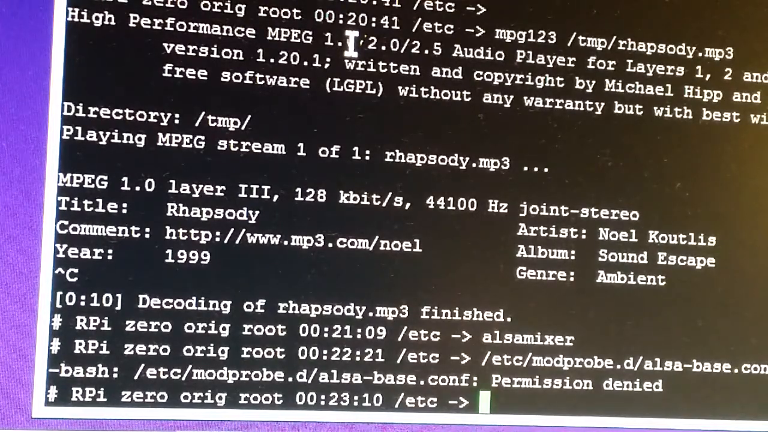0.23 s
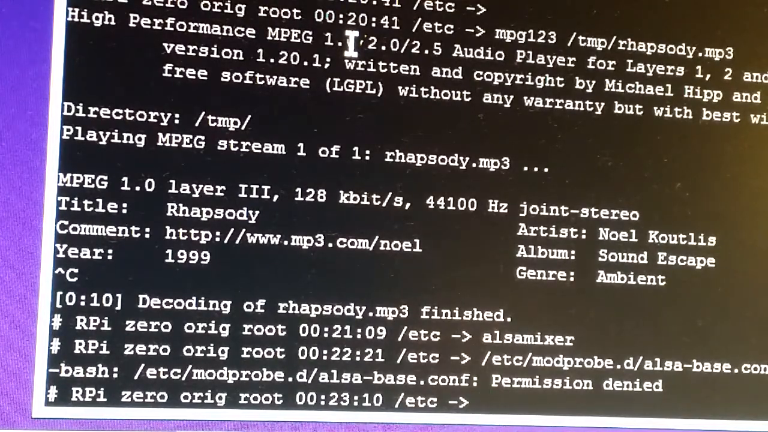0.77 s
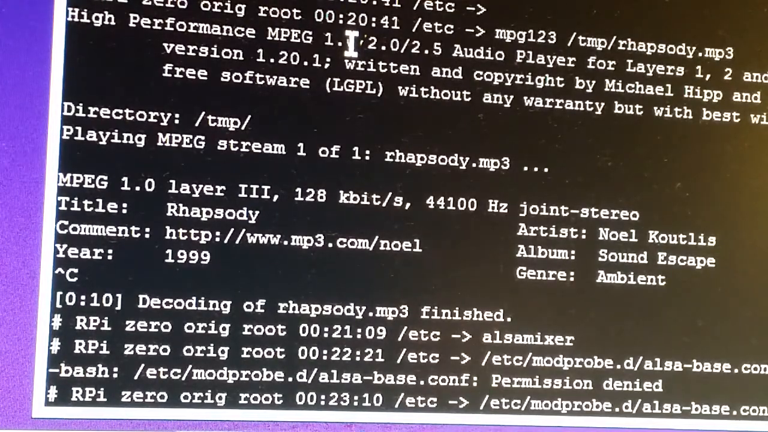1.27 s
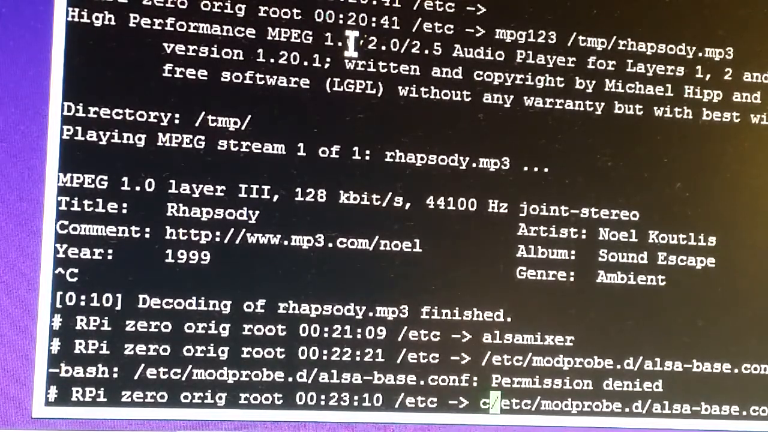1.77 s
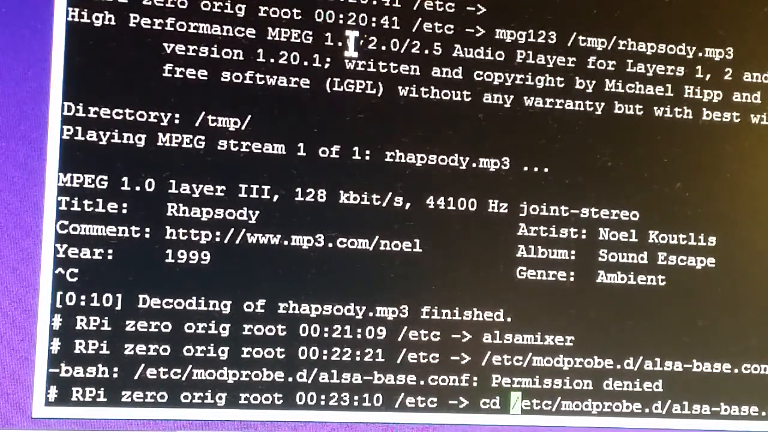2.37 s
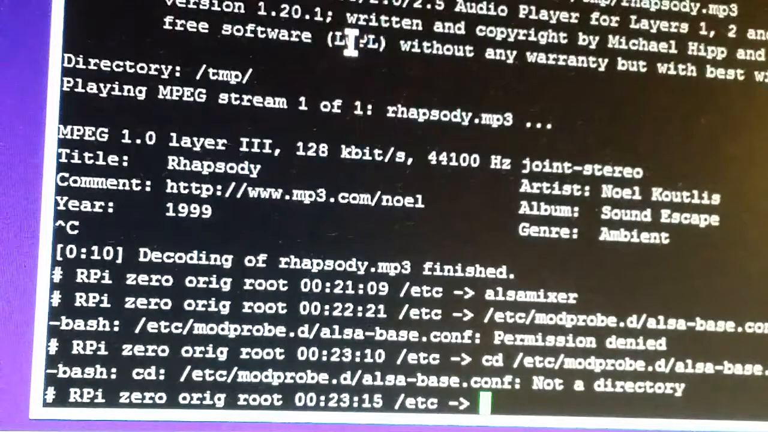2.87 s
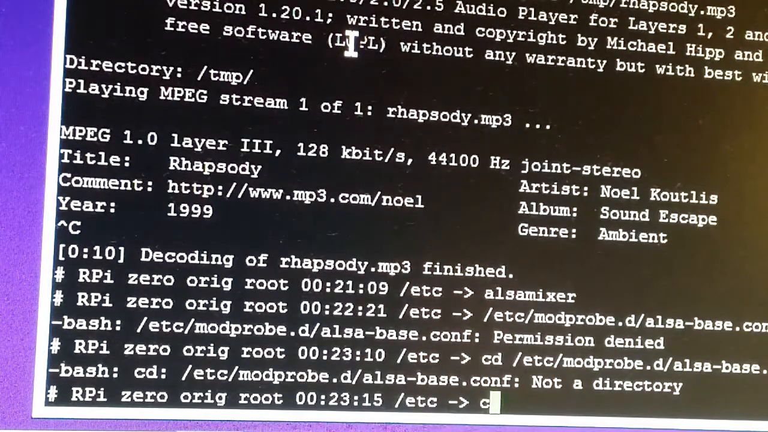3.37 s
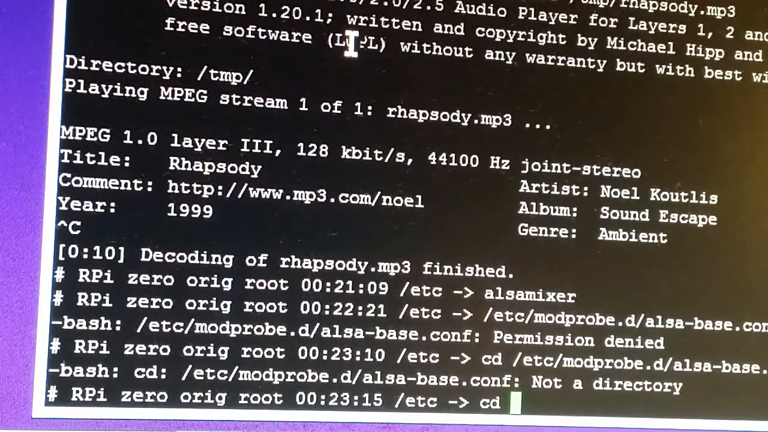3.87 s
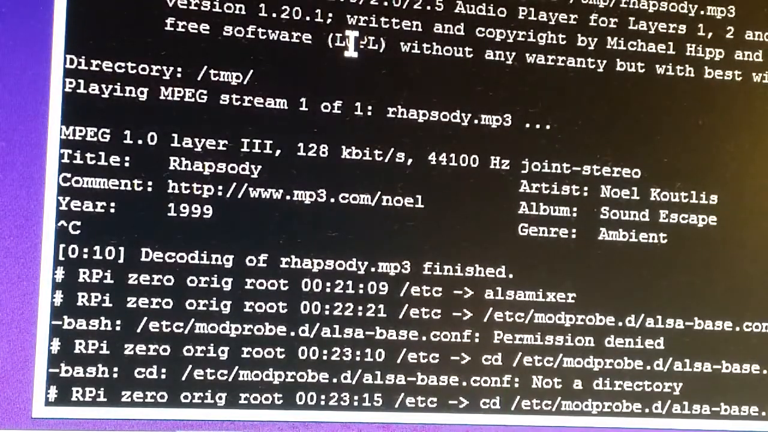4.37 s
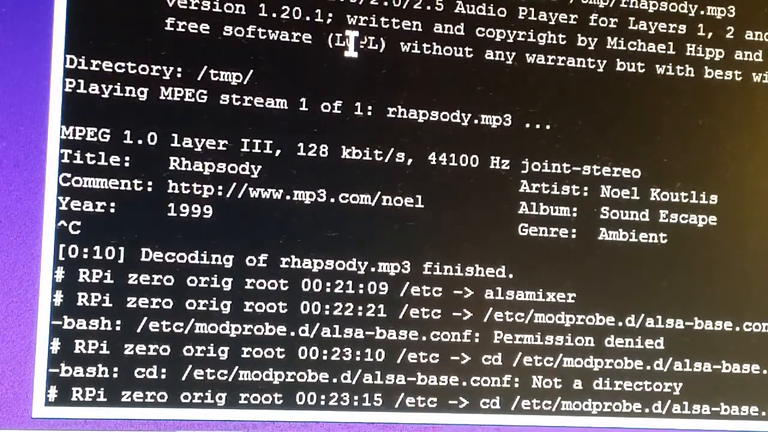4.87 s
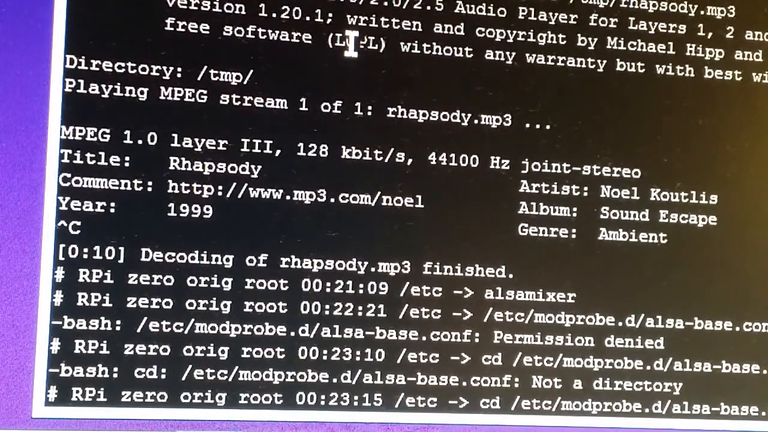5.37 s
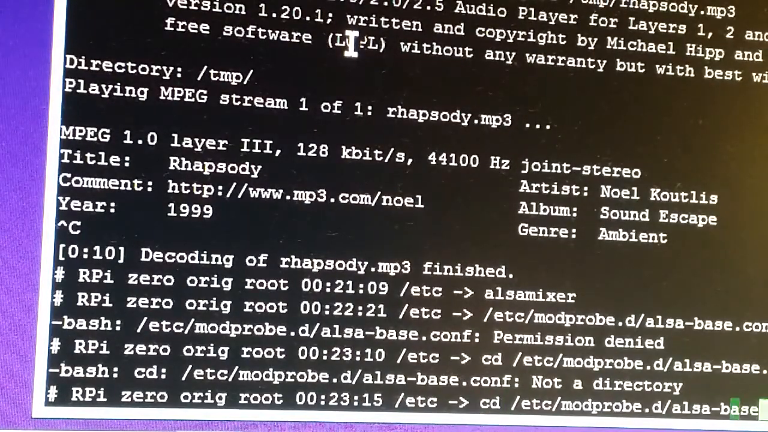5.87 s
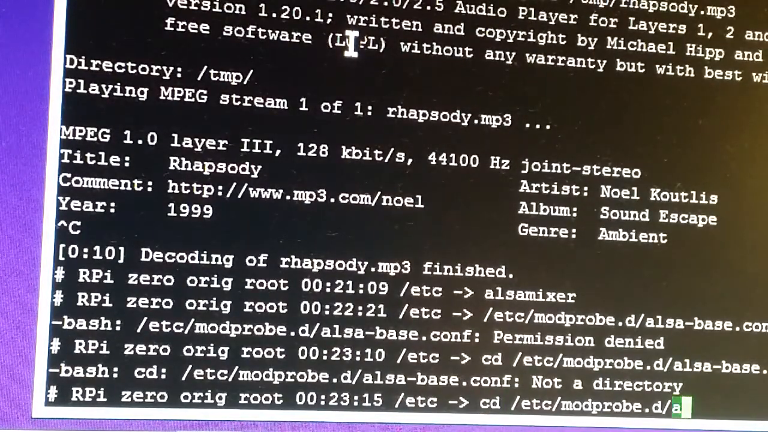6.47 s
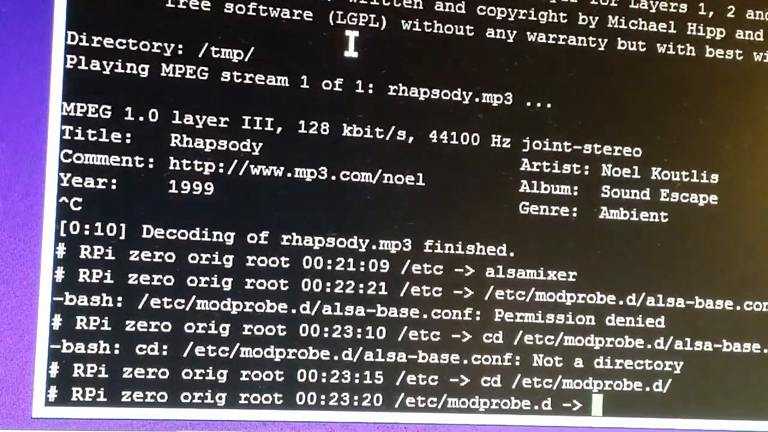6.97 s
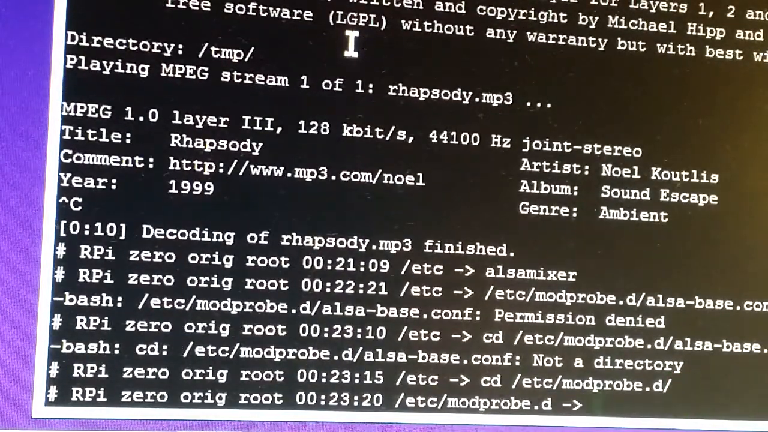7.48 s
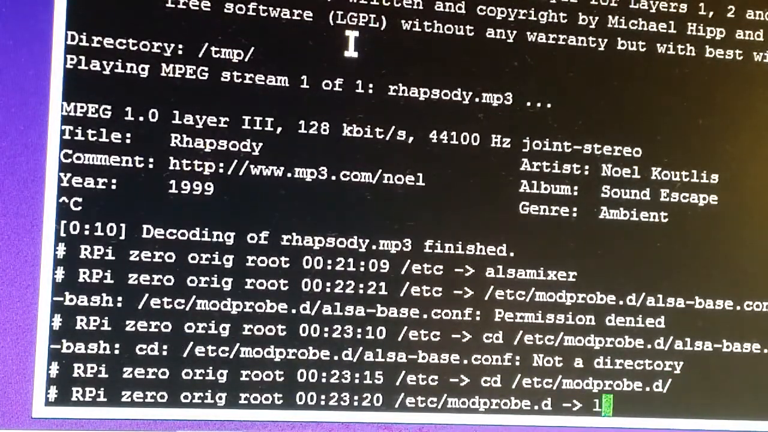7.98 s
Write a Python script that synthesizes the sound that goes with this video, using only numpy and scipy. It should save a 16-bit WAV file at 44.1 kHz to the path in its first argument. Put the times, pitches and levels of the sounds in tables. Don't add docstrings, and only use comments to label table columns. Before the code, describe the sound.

Close stereo pickup of typing on a plastic computer keyboard in a small quiet room. A faint touch opens, then mostly light brushing until bright clicks gather from about 1.6 to 4.3 seconds. A sharp group strikes near 5, more strokes come between 6 and 7.4, then faint rustles. A fan hums steadily underneath, with distant traffic and one far engine passing early on.

```python
import sys
import numpy as np
from scipy import signal
from scipy.fft import rfft, irfft, next_fast_len
from scipy.io import wavfile
from scipy.ndimage import uniform_filter1d, map_coordinates

SR = 44100
rng = np.random.default_rng(int(sys.argv[2]) if len(sys.argv) > 2 else 0)


def transcribe(signal):
    frames = np.atleast_2d(signal).T
    limited = np.clip(frames, -1, 1)
    pcm = np.round(limited * 32767).astype(np.int16)
    wavfile.write(sys.argv[1], SR, pcm)


def boost(x):
    u = np.asarray(x, float) / 20
    return 10 ** u


N = 363031

FAINT_LEFT_DB = -2.5
LEFT_LAG = 11


def unit(x):
    return x / np.sqrt(np.mean(x ** 2) + 1e-20)


def along(points, hz):
    f, v = np.transpose(points)
    return np.interp(np.log(hz + 1), np.log(f + 1), v)


def wobble(rate):
    knots = rng.standard_normal(int(N * rate / SR) + 4)
    coarse = map_coordinates(knots, [np.arange(0, N + 64, 64) * rate / SR])
    return np.interp(np.arange(N) / 64, np.arange(len(coarse)), coarse)


def filtered(x, response):
    m = next_fast_len(N + SR // 2)
    return irfft(rfft(x, m) * response(np.fft.rfftfreq(m, 1 / SR)), m)[..., :N]


def resonance(f, centre, width):
    return 1j * f * width / (centre * centre - f * f + 1j * f * width)


def body(modes, f):
    total = 0
    for k, (centre, width, db) in enumerate(modes):
        total = total + (-1) ** k * boost(db) * resonance(f, centre, width)
    return total


def rush(spectrum, patchy_db):
    # (frequency [Hz], correlation [-1..1])
    likeness = [(60, 0.9), (130, 0.98), (290, 0.89), (640, 0.36), (1410, -0.22), (3100, -0.094),
                (6820, -0.065), (15000, -0.13)]
    z = signal.stft(rng.standard_normal((2, N)), nperseg=512)[2]
    field = uniform_filter1d(rng.standard_normal(z.shape[1:]), size=6, axis=0)
    field = uniform_filter1d(field, size=14, axis=1)
    pair = signal.istft(z * boost(patchy_db * unit(field)), nperseg=512)[1][:, :N]

    def mid_side_gain(hz):
        turn = np.arccos(np.clip(along(likeness, hz), -1, 1)) / 2
        return boost(along(spectrum, hz)) * [np.cos(turn), np.sin(turn)]

    mid, side = filtered(pair, mid_side_gain)
    return unit(np.array([mid + side, mid - side]))


def background():
    # (time [s], level [dB])
    traffic = [(0.0, -56), (0.78, -59.5), (1.37, -57), (2.1, -57), (3.03, -62), (3.8, -58), (4.4, -59.5),
               (6.1, -61), (6.69, -56), (7.31, -60), (8.23, -59)]
    # (frequency [Hz], density [dB per Hz])
    rumble_colour = [(20, -57), (40, -20), (55, -1.5), (85, 4), (120, 4), (150, -8), (250, -6.5),
                     (400, -31)]
    # (frequency [Hz], density [dB per Hz])
    drone_colour = [(110, -37), (135, -4), (158, 1.5), (178, -5), (195, -4), (215, -14.5), (300, -41.5)]
    # (frequency [Hz], density [dB per Hz])
    fan_colour = [(60, -82), (200, -2.5), (320, -1), (450, -7), (800, -8.5), (1150, -12), (1700, -19.5),
                  (3500, -24.5), (4600, -29.5), (6000, -22.5), (10000, -20), (16000, -29.5)]
    # (frequency [Hz], level [dB])
    hum = [(240, -72), (312, -66), (322, -73), (769.8, -74.5), (959, -81), (1059, -79), (1238, -81)]
    engine_db, engine_far_db = -52.5, -59.5
    nearest_s, pass_s = 1.89, 0.54
    fan_level_db, fan_lift = -58, 0.24

    t = np.arange(N) / SR
    rumble_db = np.interp(t, *np.transpose(traffic))
    nearness = 1 / (1 + ((t - nearest_s) / pass_s) ** 2)
    swell_db = 10 * np.log10(1 + boost(engine_db - engine_far_db) ** 2 * nearness)
    drone_db = engine_far_db + swell_db
    outdoor_swell_db = swell_db - swell_db.mean() + rumble_db - rumble_db.mean()
    fan_db = fan_level_db + fan_lift * outdoor_swell_db
    rumble = boost(rumble_db + 0.33 * wobble(2.7)) * rush(rumble_colour, patchy_db=0.0)
    drone = boost(drone_db + 0.7 * wobble(3)) * rush(drone_colour, patchy_db=0.56)
    fan = boost(fan_db + 0.12 * wobble(7.2)) * rush(fan_colour, patchy_db=0.7)
    tones = 0
    for hz, db in hum:
        phase = 2 * np.pi * hz * t + 1.2 * wobble(9)
        spread = hz / 1800 * np.array([[1], [-1]])
        tones = tones + boost(db + 3 + 1.5 * wobble(7)) * np.sin(phase + spread)
    return rumble + drone + fan + tones


def kind(rows, knock_db):
    softness_gain = 0.21
    return [(s, db, knock_db - softness_gain * hard_db, hard_db, left_db, ms)
            for s, db, hard_db, left_db, ms in rows]


def contacts():
    # (time [s], blow [dB], hardness [dB], left over right [dB], contact [ms])
    clicks = [(1.5878, -25.5, -3.5, -0.5, 1.3), (2.1317, -29.5, -3.5, 0.5, 4), (2.3115, -33, 1, 2, 4),
              (2.3147, -20, -10, -12, 1.7), (2.3184, -31, 2, -4, 1.3), (2.3264, -29, -1.5, -3, 1.9),
              (2.3337, -36, -14, 10, 1.4), (2.4655, -28.5, -5.5, -18, 3), (3.0159, -42.5, 7, -12, 2.4),
              (3.0283, -45.5, 4, 0, 2), (3.0482, -40, 0, -1, 2.6), (3.3501, -32.5, -4.5, -7, 3.8),
              (3.6896, -35, -13, 1, 1.2), (3.6926, -27.5, -1.5, -7, 2), (3.6964, -34, -2, 4, 1.2),
              (3.7, -36, 0, -6, 1.3), (3.7044, -32, -2, 1.5, 3.4), (3.7123, -32, -9, -16, 2.5),
              (3.7226, -29, -2, -4.5, 7.7), (3.7431, -45, -3, 0, 2), (3.8081, -43.5, 3, 5, 3.7),
              (4.3231, -27, -6, -7, 4), (4.4912, -38.5, -1, -15, 1.7), (7.9268, -43.5, 7, -9, 2.1)]
    landings = [(0.1499, -36.5, -6, -5, 1.8), (1.6677, -34.5, -4, -1, 5), (1.7041, -37, -7, 1, 3.7),
                (1.7182, -33, -8, -4, 1.8), (1.9287, -38, -6, -5, 3.0), (2.3451, -31, -8, -10, 3),
                (2.4537, -28, -1, -2, 6), (3.3084, -31, 2, 4, 4.1), (3.4254, -34, -10, -1, 1.6),
                (3.5253, -34, 3.5, 0.5, 2.8), (3.6375, -35, -4, 2.5, 8.4), (4.9617, -33.5, 1, 0, 0.68),
                (5.1069, -23.5, -5.5, -4.5, 2.4), (5.2135, -34, -6, -3, 2.8),
                (6.0678, -33.5, -2.5, -9, 3.9), (6.2937, -37, -0.5, -4, 1.7), (6.3035, -39.5, -0.5, 1, 1.3),
                (6.4071, -25.5, 0, -5, 2.5), (6.8993, -21, -12, -5, 2.8), (7.0062, -39, 0, 2, 6.8),
                (7.01, -37.5, 4, -8, 5.1), (7.2475, -46, 8.5, -16, 1.5), (7.3004, -38.5, -10.5, -4, 3.8),
                (7.393, -37.5, -7, -4, 5.2)]
    bottoms = [(0.1896, -41.5, 4.5, -4, 1.9), (1.8088, -38, 3.5, 1, 5.3), (1.8284, -37, 2.5, -4, 2.8),
               (2.0282, -37.5, 1.5, 2, 3.5), (2.0334, -40, -4, -13, 2.1), (2.1762, -31.5, -10, -2.5, 2.9),
               (2.5777, -42, 4.5, -2, 1.8), (3.3172, -32.5, -10, -8, 4.5), (3.5584, -34, -19, -1, 2.7),
               (3.9799, -40, 3.5, -2.5, 7), (4.9546, -33.5, 6.5, 0, 1.1), (5.037, -34, -9, -10, 3),
               (5.0426, -34.5, 3, -4, 5.4), (5.1142, -36.5, 2, -3, 1.7), (5.119, -44, -7, -21, 1.4),
               (5.2458, -31.5, 1.5, -1, 1.8), (5.2651, -35, 3, 1.5, 3.2), (6.1906, -41.5, 4.5, -4, 1),
               (6.4205, -37, -7, -10, 2.7), (6.5005, -38, 0, -5, 8.9), (6.5064, -38, -4, -1, 3.3),
               (6.5137, -40.5, 2, -6, 1.7), (6.8917, -32.5, 9, 0, 0.87), (7.2428, -38, 0, -3, 2.6)]
    # (time [s], blow [dB], hardness [dB], contact [ms])
    rattles = [(0.205, -43, -5, 2.8), (0.465, -42.5, -5, 1.7), (1.152, -39.5, -5, 1.9),
               (1.1952, -40, -4, 1.4), (1.287, -39, 0.5, 2), (1.464, -44, -2, 6.5), (1.509, -40, 0, 2.9),
               (1.7114, -41, -8, 1.1), (1.7272, -49, -2, 1.8), (2.4854, -39, -5, 1.5),
               (2.5902, -37.5, -15, 1.6), (3.006, -40, -2, 2.4), (3.3654, -42, -8, 1.9),
               (3.37, -42, -12, 1.8), (3.4352, -45, -1, 1.6), (3.6875, -35, -4, 4),
               (3.8233, -46.5, 8.5, 1.6), (5.199, -42, -3, 1.7), (6.056, -39, -5, 3),
               (6.289, -40.5, -5, 1.4), (6.484, -42, -7, 1.2), (7.003, -36, -3, 1.7), (7.279, -43, -4, 2.1),
               (7.339, -46, -8, 6.5), (7.42, -47, -6, 7.1), (7.908, -45, -9, 2.7), (8.09, -43, -11, 5),
               (8.1848, -40.5, 2.5, 1.9)]
    # (time [s], blow [dB], hardness [dB])
    brushes = [(0.161, -50, 7.5), (0.2, -42, -5), (0.5119, -48, -1), (0.838, -50, -5), (1.2034, -45, 3.5),
               (1.293, -43, -1), (1.4368, -42, -18), (1.442, -54, 5), (1.4562, -42, -10), (1.4935, -48, 0),
               (2.268, -48, -5), (2.271, -49, 5.5), (2.5173, -47, -2), (3.0669, -48, -2),
               (3.4862, -48, 3.5), (3.627, -43, -6), (4.0059, -48, -9), (6.038, -45, -6), (6.223, -44, -9),
               (6.2383, -46, -5), (6.4977, -50, -9), (7.1313, -46, -5.5), (7.26, -45, -8),
               (7.287, -51, -11), (7.3148, -46, -1), (7.332, -49, -2), (7.9612, -51, 5), (8.105, -42, -6),
               (8.1235, -50.5, 9.5), (8.177, -41, -7)]
    brush_ms = 1.5
    sided_rattles = [(s, db, hard_db, FAINT_LEFT_DB, ms) for s, db, hard_db, ms in rattles]
    sided_brushes = [(*row, FAINT_LEFT_DB, brush_ms) for row in brushes]
    return (kind(clicks, knock_db=-38.5) + kind(landings, knock_db=-10) + kind(bottoms, knock_db=-3)
            + kind(sided_rattles, knock_db=-10.5) + kind(sided_brushes, knock_db=-6.5))


CONTACTS = contacts()


def own_modes(width_hz, share, count):
    f = np.fft.rfftfreq(2048, 1 / SR)
    centre = 700 * 22 ** rng.random((len(CONTACTS), count, 1))
    width = width_hz * np.sqrt(centre / 4000)
    gain = share + resonance(f, centre, width).sum(axis=1)
    return gain / np.sqrt(np.mean(np.abs(gain[:, 30:700]) ** 2, axis=1, keepdims=True))


def bursts(db, stretch, shared, slide_db, solid, plain):
    s, *_, left_db, ms = np.transpose(CONTACTS)
    span = np.arange(-400, 1648)
    t = span * 1000 / SR - .7
    u = t / (stretch * np.clip(ms, .4, 8)[:, None])
    blow = np.exp(-np.where(u < 0, 14 * u ** 2, 3.5 * np.abs(u) ** 1.6))
    slide = boost(slide_db) * np.exp(-np.abs(t) / np.where(t < 0, 1.1, 4))
    shape = (blow + slide) / np.linalg.norm(blow + slide, axis=1, keepdims=True)
    near, other = rng.standard_normal((len(s), 2, 2048)).transpose(1, 0, 2)
    near[:, 431] = solid * 1.82 / np.sqrt(ms)
    other[:, 436] = near[:, 431]
    shared = np.clip(shared, 0, 1)
    far = boost(left_db)[:, None] * (shared * near + np.sqrt(1 - shared ** 2) * other)
    pair = boost(db)[:, None] * shape * [far, near]
    pair = irfft(rfft(pair) * own_modes(550, share=plain, count=12))
    at = (np.round(s * SR).astype(int)[:, None] + span).ravel()
    return np.array([np.bincount(at + lag, v.ravel(), N + 2100)[:N] for v, lag in zip(pair, (LEFT_LAG, 0))])


def keyboard():
    # (frequency [Hz], level [dB])
    cap_colour = [(1500, -69), (2600, -9), (4000, -5.5), (5500, 1), (7000, -0.5), (9000, -75)]
    # (frequency [Hz], level [dB])
    stem_colour = [(5500, -14.5), (7300, 0.5), (10000, -7), (12500, 0), (15000, -5.5), (18000, -15)]
    # (centre [Hz], width [Hz], level [dB])
    case_modes = [(466, 320, -37), (855, 740, -11), (1220, 600, -14.5), (1580, 190, -5), (2270, 350, -7.5),
                  (3220, 370, -6), (4100, 600, -12)]
    _, blow_db, knock_db, hard_db, *_ = np.transpose(CONTACTS)
    cap = bursts(blow_db + 16.5, stretch=1.0, shared=0.066, slide_db=-14, solid=1.4, plain=7.8)
    cap = filtered(cap, lambda hz: boost(along(cap_colour, hz)))
    stem = bursts(blow_db + hard_db + 19, stretch=1.0, shared=0.11, slide_db=-13, solid=1.8, plain=1.8)
    stem = filtered(stem, lambda hz: boost(along(stem_colour, hz)))
    case = bursts(blow_db + knock_db + 26, stretch=0.93, shared=0.55, slide_db=-11, solid=4.6, plain=2.6)
    case = filtered(case, lambda hz: body(case_modes, hz))
    return cap + stem + case


def tail(t60, size):
    hz, t, z = signal.stft(rng.standard_normal((2, size)), SR, nperseg=128)
    x = signal.istft(z * boost(-60 * t / t60(hz)[:, None]), SR, nperseg=128)[1]
    return x / np.linalg.norm(x, axis=1, keepdims=True)


def space(x):
    # (frequency [Hz], t60 [s])
    room_decay = [(500, 0.067), (3000, 0.42), (8000, 0.27), (15000, 0.12)]
    # (frequency [Hz], t60 [s])
    desk_decay = [(1000, 0.054), (5000, 0.046), (9000, 0.038), (15000, 0.012)]
    out = np.zeros((2, N + SR))
    for at in range(0, N, 7000):
        walls = boost(-16.5) * tail(lambda hz: along(room_decay, hz), size=9000)
        answer = np.pad(walls, ((0, 0), (250, 0)))
        desk = boost(-8.0) * tail(lambda hz: along(desk_decay, hz), size=3000)
        size = desk.shape[1]
        ticks = np.repeat(boost(7 * rng.standard_normal(size // 40 + 1)), 40)[:size]
        answer[:, :size] += desk * unit(ticks)
        echo = signal.fftconvolve(x[:, at:at + 7000], answer, axes=1)
        out[:, at + 40:at + 40 + echo.shape[1]] += echo
    return out[:, :N]


def rings(rows, lift_db, held_s):
    ring_lag_s = .0004
    x, t = np.zeros((2, N + 1000)), np.arange(400) / SR
    swell = t / held_s * np.exp(-(t / held_s) ** 2 / 2)
    for s, db, hz, left_db in rows:
        tone = boost(db + lift_db) * swell * np.sin(2 * np.pi * hz * t)
        at = round((s + ring_lag_s) * SR)
        x[0, at + LEFT_LAG:at + LEFT_LAG + 400] += boost(left_db) * tone
        x[1, at:at + 400] += tone
    return x[:, :N]


def ringing():
    # (time [s], peak [dB], pitch [Hz], left over right [dB])
    cap_rings = [(0.189, -49, 6430, -2), (1.2865, -44, 6640, -2), (1.5873, -35, 5630, 10),
                 (1.6666, -43, 5950, -2), (1.7175, -39, 4840, 2), (2.1306, -33, 5550, 4),
                 (2.3141, -36, 6340, -5), (2.3174, -32, 4700, -2), (2.3254, -36, 6350, 0),
                 (2.4528, -35, 6760, -2), (2.4644, -31, 6240, -2), (3.3079, -30, 6600, -2),
                 (3.5239, -38, 4550, -1), (3.692, -37, 7040, -2), (3.7034, -37, 4830, -4),
                 (3.7114, -40, 6000, -5), (4.3226, -30, 6980, 1), (4.9536, -25, 6060, 4),
                 (5.0424, -40, 6420, 4), (5.1058, -42, 5800, -10), (5.1134, -36, 5000, -3),
                 (5.245, -37, 5400, -7), (5.2644, -43, 5920, -4), (6.0666, -55, 4660, -6),
                 (6.1898, -45, 5080, -3), (6.4058, -32, 5500, -2), (6.4194, -41, 5400, 0),
                 (6.8982, -31, 4940, 0), (7.003, -42, 5940, -2), (7.2424, -45, 6440, 0)]
    # (time [s], peak [dB], pitch [Hz], left over right [dB])
    case_rings = [(1.5866, -40, 3450, -5), (1.717, -44, 4380, 0), (1.8108, -46, 2270, -4),
                  (1.8265, -46, 3200, -2), (2.0268, -49, 1510, -4), (2.1311, -48, 3400, -6),
                  (2.176, -39, 3220, -6), (2.3141, -35, 3070, -3), (2.4525, -38, 3000, -9),
                  (2.4644, -43, 2900, -2), (3.309, -41, 4330, -2), (3.424, -43, 3220, -4),
                  (3.5249, -46, 3430, -7), (3.5583, -42, 3300, -6), (3.6366, -46, 1550, 2),
                  (3.692, -43, 4130, -2), (3.712, -45, 3800, -2), (4.3226, -37, 3330, -2),
                  (4.9535, -32.5, 1900, -12), (4.9634, -37, 3140, -2), (5.036, -42, 2280, -6),
                  (5.0424, -49, 1560, -2), (5.1064, -49, 3330, -2), (5.1133, -31, 2170, -9),
                  (5.2438, -38, 1610, -4), (5.2633, -45, 2960, -4), (6.1888, -49, 2160, -7),
                  (6.2228, -58, 2160, 3), (6.4074, -34, 2540, -9), (6.5046, -51, 3200, -2),
                  (6.8907, -37, 2350, -8), (6.8984, -29, 3150, -7), (7.003, -52, 2340, 2),
                  (7.2419, -45, 3170, 4)]
    # (time [s], peak [dB], pitch [Hz])
    stem_rings = [(0.1888, -29.5, 8780), (1.5866, -22, 8000), (1.5944, -40, 8060), (1.8078, -33, 8490),
                  (2.1306, -37, 9200), (2.3141, -24.5, 9200), (2.3174, -33, 8890), (2.3252, -27, 9270),
                  (2.3334, -36, 10000), (2.4526, -25.5, 8500), (2.577, -32, 9200), (3.3074, -43, 8840),
                  (3.5244, -34, 8740), (3.6915, -31, 9200), (3.7034, -27, 9200), (3.723, -24, 8410),
                  (3.808, -28, 8500), (4.3215, -34, 8800), (4.9541, -19, 9300), (5.0417, -26, 8560),
                  (5.1058, -24, 8160), (5.1134, -27, 9200), (5.245, -19, 9370), (5.2644, -35, 9920),
                  (6.0671, -29, 8640), (6.1898, -37, 9530), (6.407, -27.5, 8600), (6.8907, -28.5, 9000),
                  (6.8984, -34, 8300), (7.0053, -29.5, 9150)]
    stems = [(*row, FAINT_LEFT_DB) for row in stem_rings]
    return (rings(cap_rings, lift_db=2.5, held_s=.0008) + rings(case_rings, lift_db=1.0, held_s=.0011)
            + rings(stems, lift_db=-7.5, held_s=.0006))


def wire():
    wire_times = [
        4.9613,
        4.9535,
        4.3231,
        1.727,
        5.2651,
        6.8908,
    ]
    wire_levels = [-29.5, -43, -44, -58, -45, -52]
    x, t = np.zeros((2, N)), np.arange(-60, 400) / SR
    for s, db in zip(wire_times, wire_levels):
        fade_db = -60 * np.abs(t) / np.where(t < 0, .003, .009)
        tick = boost(db + 21.0 + fade_db) * rng.standard_normal((2, len(t)))
        x[:, round(s * SR) - 30:][:, :len(t)] += tick
    return filtered(x, lambda hz: np.exp(-((hz - 13400) / 1900) ** 2))


def thumps():
    # (time [s], level [dB])
    heavy_strokes = [
        (2.0277, -49),
        (2.176, -41),
        (3.559, -41),
        (4.9572, -50),
        (5.1144, -48),
        (6.4087, -55),
        (6.5061, -49),
        (6.901, -43),
        (7.2422, -69),
    ]
    # (centre [Hz], width [Hz], level [dB])
    desk_modes = [(490, 1150, -5), (850, 310, 4.5), (1120, 860, -6)]
    x, t = np.zeros((2, N)), np.arange(300) / SR
    for s, db in heavy_strokes:
        push = rng.standard_normal((3, len(t)))
        push = boost(-60 * t / 0.013) * (push[0] + 0.76 * push[1:])
        x[:, round(s * SR):][:, :len(t)] += boost(db + 37.5) * push / np.linalg.norm(push)
    return filtered(x, lambda hz: body(desk_modes, hz))


def scene():
    keys = keyboard() + ringing() + thumps() + wire()
    return keys + space(keys) + background()


def band_limit(x):
    return signal.sosfilt(signal.butter(12, 16640, fs=SR, output="sos"), x)


def record(dry):
    # (frequency [Hz], gain [dB])
    left_port = [(100, 1.5), (4000, 0), (6300, 2.5), (8500, -4.5), (10500, -0.5), (12500, -14),
                 (15500, -10)]
    # (frequency [Hz], gain [dB])
    right_port = [(100, 2.5), (1500, 1), (7200, 0), (7800, 11), (8350, 10.5), (8900, 16.5), (9250, 14),
                  (9650, 16), (10000, 14.5), (10450, 6), (11400, 4), (11900, -1), (16000, 0)]
    # (frequency [Hz], gain [dB])
    roll_off = [(15400, 0), (15600, -8), (16600, -20), (16690, -90)]
    ports = filtered(dry, lambda hz: boost([along(left_port, hz), along(right_port, hz)]))
    hiss = boost(-64) * rng.standard_normal((2, N))
    captured = filtered(ports + hiss, lambda hz: boost(along(roll_off, hz)))
    return band_limit(captured)


dry = scene()
out = record(dry)
transcribe(out)
```